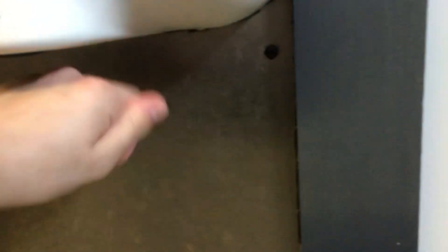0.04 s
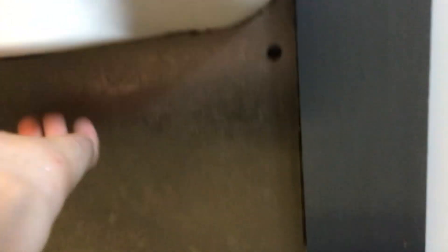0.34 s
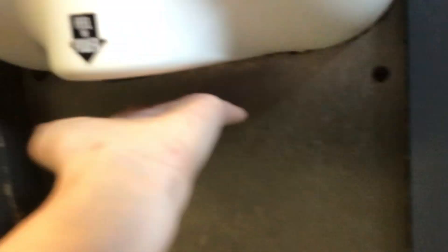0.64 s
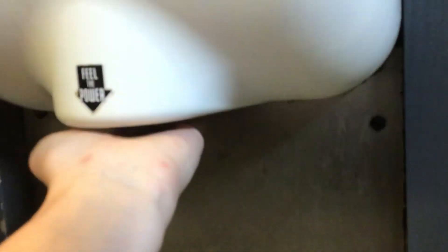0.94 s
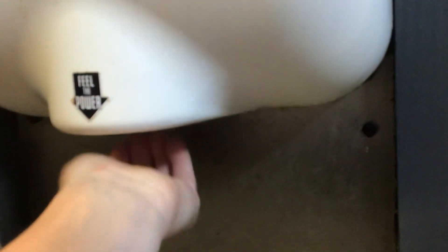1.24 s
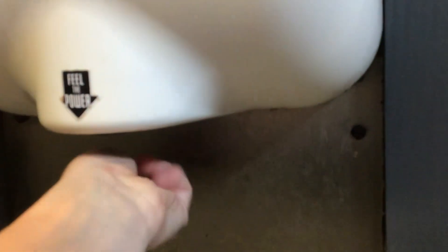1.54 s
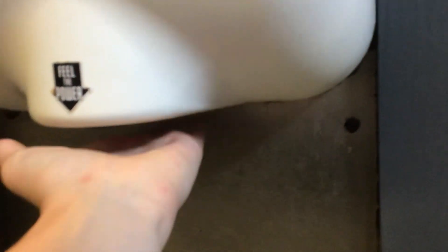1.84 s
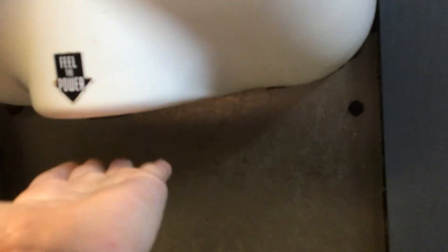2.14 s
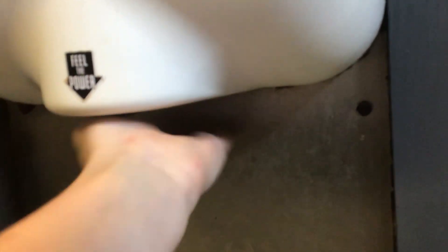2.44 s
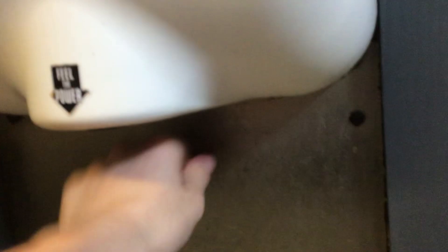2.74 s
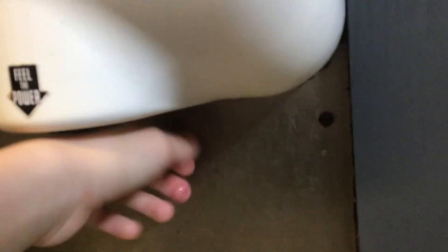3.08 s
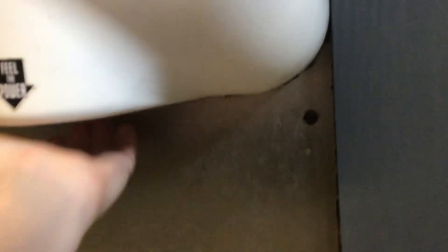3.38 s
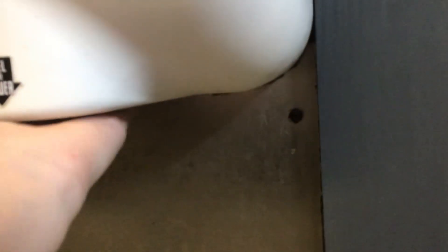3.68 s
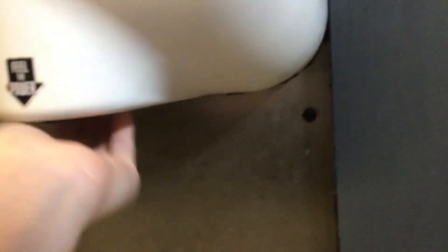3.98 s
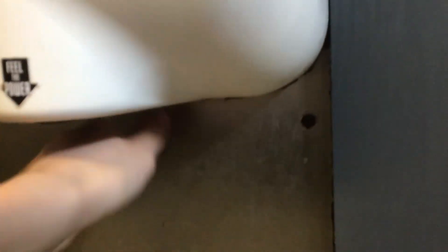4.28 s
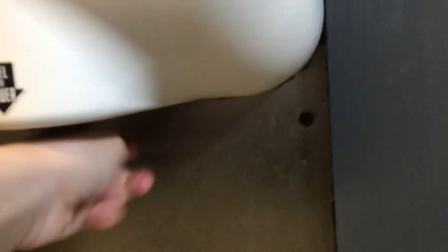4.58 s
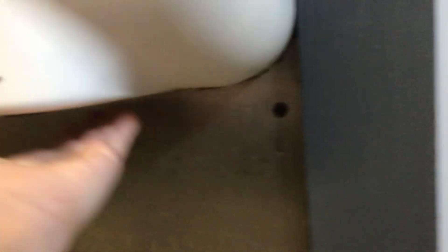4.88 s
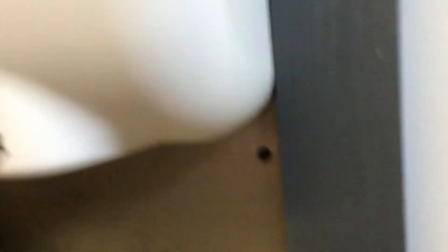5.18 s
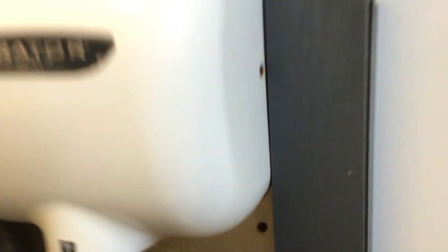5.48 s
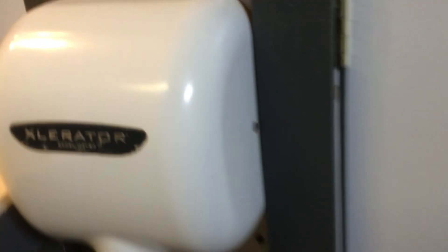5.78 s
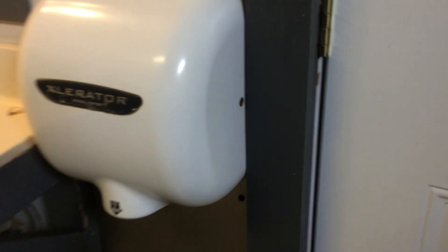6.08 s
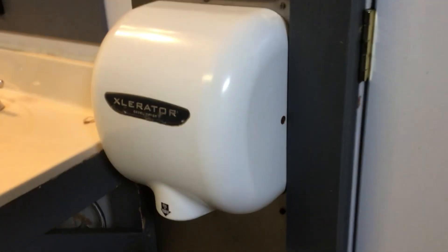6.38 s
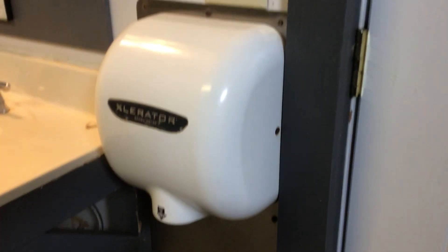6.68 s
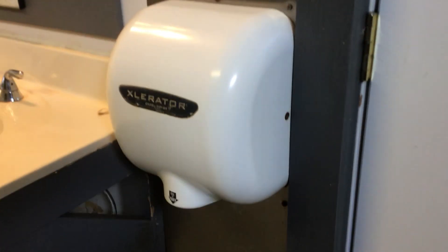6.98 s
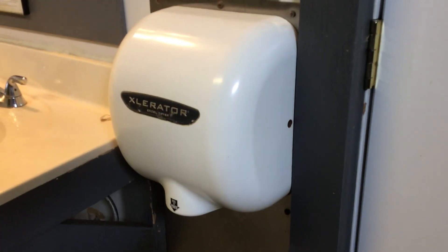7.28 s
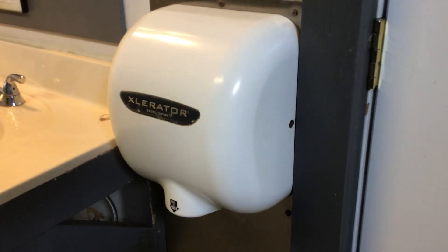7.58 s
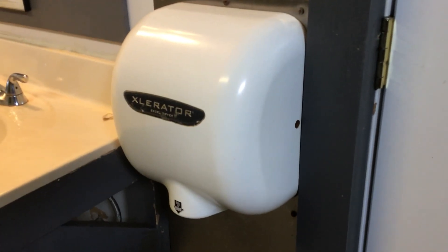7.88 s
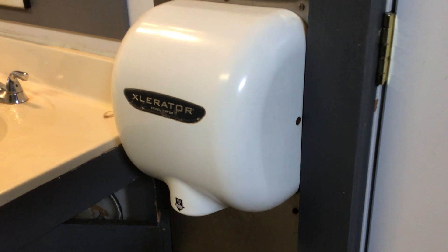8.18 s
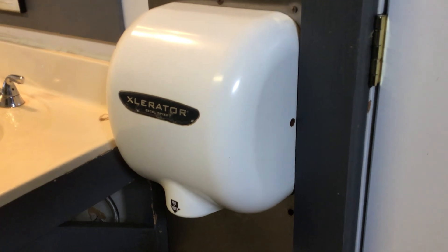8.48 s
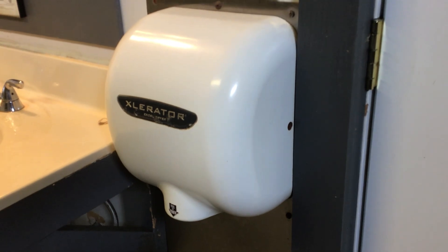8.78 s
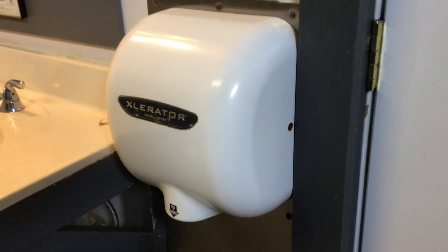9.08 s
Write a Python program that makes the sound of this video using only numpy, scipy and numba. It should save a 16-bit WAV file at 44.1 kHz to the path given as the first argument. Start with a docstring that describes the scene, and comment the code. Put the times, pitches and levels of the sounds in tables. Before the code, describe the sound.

A loud hand dryer roars and hisses over a moving hand, then clicks and winds down with a falling whine.

```python
"""A small tiled washroom, one microphone at arm's length from a high-speed hand dryer.
Air rushes through the housing over the motor's hum and whine. The jet roars on a turning hand, rings in
the cupped palm and hisses when skin comes close to the nozzle; stray gusts thump the microphone.
The hand leaves, the listener steps back, a relay clicks, and the motor coasts down, its tones sliding
through the resonances of the housing."""
import sys
import numpy as np
from scipy import signal
from scipy.fft import rfft, irfft, next_fast_len
from scipy.io import wavfile
from scipy.ndimage import uniform_filter1d
from numba import njit

SR = 44100
rng = np.random.default_rng(int(sys.argv[2]) if len(sys.argv) > 2 else 0)


def output_pcm(signal):
    """Save a mono or channel-first signal as 16-bit PCM at the path in sys.argv[1].

    Samples are clipped to [-1, 1] before scaling.
    """
    pcm = np.clip(np.atleast_2d(signal).T, -1, 1) * 32767
    wavfile.write(sys.argv[1], SR, np.round(pcm).astype(np.int16))


N = 411453
TIME = np.arange(N) / SR
FREQ = np.maximum(np.arange(N // 2 + 1) * SR / N, 1)
FULL_SPEED_HZ, TOP_HZ = 382, 15800  # shaft turns per second; upper limit of the recorder


def undb(db):
    """Decibels to gain."""
    return 10 ** (np.asarray(db) / 20)


def curves(table):
    """The columns of a table, joined by straight lines in time."""
    times, *columns = np.transpose(table)
    return [np.interp(TIME, times, column) for column in columns]


def colour(points, hz=FREQ):
    """Gain of a (frequency [Hz], level [dB]) spectrum at the given frequencies."""
    freqs, db = np.transpose(points)
    return undb(np.interp(np.log(hz), np.log(freqs), db))


def resonance_gain(modes, hz=FREQ):
    """Gain of a resonant body: each mode stands out of a flat base."""
    peaks = sum(undb(db) ** 2 / (1 + (2 * (hz - f) / width) ** 2) ** 2 for f, width, db in modes)
    return np.sqrt(1 + peaks)


def noise(gain):
    """Noise of rms 1, shaped by a gain at each frequency."""
    size = next_fast_len(N, True)
    gain = np.interp(np.arange(size // 2 + 1) * SR / size, FREQ, gain)
    x = irfft(rfft(rng.standard_normal(size)) * gain, size)[:N]
    return x / x.std()


def ringing_air(modes):
    """Resonances stirred by airflow: one band of noise for each."""
    return sum(undb(db) * noise(1 / (1 + (2 * (FREQ - hz) / width) ** 2)) for hz, width, db in modes)


def steady(x, size=SR // 10):
    """Hold the rms at 1 over windows of this many samples."""
    return x / np.sqrt(uniform_filter1d(x ** 2, size) + 1e-12)


def walk(rate_hz):
    """A random wander with a spread near 1."""
    knots = rng.standard_normal(4096)
    return np.sqrt(3 / 2) * np.interp(TIME * rate_hz, np.arange(len(knots)), knots)


@njit
def band(x, hz, width_hz):
    """State-variable band-pass with a moving centre."""
    y, band_state, low_state = np.empty(len(x)), 0., 0.
    for i in range(len(x)):
        g, damping = np.tan(np.pi * hz[i] / SR), width_hz / hz[i]
        v = (band_state + g * (x[i] - low_state)) / (1 + g * (g + damping))
        band_state, low_state = 2 * v - band_state, low_state + 2 * g * v
        y[i] = damping * v
    return y


def below(x, hz):
    """Low-pass without phase shift, so that split bands add up again."""
    return signal.sosfiltfilt(signal.butter(2, hz, fs=SR, output="sos"), x)


def room(x, wet_db, t60):
    """Direct sound and the dense echo of close tiled walls, at unchanged power."""
    t = TIME[:SR // 2]
    tail = rng.standard_normal(len(t)) * undb(-60 * t / t60) * (t > .003)
    response = undb(wet_db) * tail / np.linalg.norm(tail)
    response[0] = 1
    return signal.fftconvolve(x, response / np.linalg.norm(response))[:N]


# Background of the washroom: (frequency [Hz], relative level [dB])
ROOM_TONE = [(25, -32), (60, -7), (115, -4), (200, -4), (420, -16), (600, -21), (1000, -22), (2000, -29),
             (5000, -46.5), (15000, -38)]

def room_tone():
    """A faint, low rumble all around the microphone."""
    return noise(colour(ROOM_TONE)) * undb(-54)


def shaft_speed(coast_at_s=5.8005, drag_per_s=.2993, friction_per_s=.2255):
    """Turns per second: full speed, then a coast against air drag (speed squared) and bearing friction."""
    fade = np.exp(-friction_per_s * np.maximum(TIME - coast_at_s, 0))
    return FULL_SPEED_HZ * fade / (1 + drag_per_s / friction_per_s * (1 - fade))


# Turbulence in the blower: (frequency [Hz], relative level [dB])
RUSH_SPECTRUM = [(30, -30), (70, -6), (160, 0), (450, -2.5), (700, 2.5), (1050, -8.5), (2000, 5.5),
                 (2900, 1), (3600, -8.5), (5300, -21), (8500, -21), (10500, -28), (12500, -19),
                 (15500, -21)]
# Resonances of the housing: (frequency [Hz], width [Hz], gain [dB])
HOUSING_MODES = [(115.4, 15.6, 12.5), (598, 110, 8), (812, 22, 3.5), (1344, 160, 5), (1750, 88, 11),
                 (1957, 155, 13), (2340, 210, 4), (2667, 62, 11), (4126, 490, 11), (4560, 130, 12),
                 (6470, 1000, 10.5)]
# Air cavity behind the shell: (frequency [Hz], width [Hz], level at full speed [dB])
CAVITY_MODES = [(565, 80, -45), (818, 43, -57), (1930, 180, -57.5), (2644, 29, -54.5), (4360, 960, -55.5)]

def blower(speed, rush_db=-27, speed_power=2.29):
    """Turbulence rings the housing; as the fan slows the treble dies first and the hollow ring last."""
    slowing_db = 20 * np.log10(speed / FULL_SPEED_HZ)
    air = noise(colour(RUSH_SPECTRUM) * resonance_gain(HOUSING_MODES))
    low, high = below(air, 900), air - below(air, 4900)
    middle = air - low - high
    dulled = low * undb(-.05 * slowing_db) + middle + high * undb(.36 * slowing_db)
    rush = dulled * undb(rush_db + speed_power * slowing_db)
    ring = ringing_air(CAVITY_MODES) * undb(1.1 * slowing_db)
    return room(rush + ring, wet_db=-7.5, t60=.35)


# Resonances of the wall mount: (frequency [Hz], width [Hz], gain [dB])
MOUNT_MODES = [(355, 36, 18.5), (273, 52, 19.5), (234, 27, 16), (209, 27, 22.5), (156, 34, 17)]

def shaft_hum(speed, angle):
    """Shaft unbalance hums through the mount, louder under the nozzle than after the step back."""
    near_db = np.interp(TIME, [4.9, 5.2], [8, 0])
    gain = undb(-57.5 + near_db) * resonance_gain(MOUNT_MODES, speed) * (speed / FULL_SPEED_HZ) ** .99
    return room(gain * np.sin(angle), wet_db=-1, t60=.65)


# How well the outlet passes the blade tone: (frequency [Hz], gain [dB])
OUTLET_RESPONSE = [(1100, -37), (1230, -29), (1380, -7.5), (1590, -12.5), (1830, -6), (1970, 2),
                   (2130, -3.5), (2300, 0.5), (2460, -5), (2660, 2), (3450, -3.5)]

def blade_tone(speed, angle, blades=9, waver_db=2.9):
    """The fan blades sing through the housing, shaken by uneven inflow."""
    hz = blades * speed
    tone = undb(1.8 * walk(60)) * np.sin(blades * angle + .45 * walk(90))
    # the shell shields the tone until the listener steps out from under it
    shade_db = np.interp(TIME, [5.33, 5.42], [-6.5, 0])
    tone *= undb(-41 + shade_db + waver_db * walk(8))
    tone *= resonance_gain(HOUSING_MODES, hz) * colour(OUTLET_RESPONSE, hz)
    return room(tone, wet_db=-2.5, t60=.64)  # as it falls, it beats against its own echo


# Commutator whine ahead of the vents, by multiple of the bar rate: (relative level [dB])
WHINE_HARMONICS = [-73, -71, -73, -79, -83]
# How the whine leaks through the vents: (frequency [Hz], gain [dB])
VENT_RESPONSE = [(2400, 17), (2700, 16.5), (3100, 6), (3800, 12), (5000, -5), (5500, -6), (5950, -13),
                 (6500, -3), (7300, -9), (8300, -6), (9000, -1), (10000, -11), (10500, -25), (11500, -7),
                 (13300, -6), (15300, -2)]

def brush_whine(speed, angle, bars=24, chatter_rad=1.05):
    """The brushes whine on the commutator bars; chatter and the room fray each line."""
    whine = 0
    for k, db in enumerate(WHINE_HARMONICS, 1):
        hz = k * bars * speed
        line = undb(2.5 * walk(24)) * np.sin(k * bars * angle + chatter_rad * walk(140))
        whine += undb(db) * line * (hz < TOP_HZ) * colour(VENT_RESPONSE, hz)
    strike = 2.1 * (speed / FULL_SPEED_HZ) ** .53  # they hit the bars harder at speed
    return room(whine * strike, wet_db=5, t60=.34)


def motor(speed):
    """One slightly unsteady shaft drives the hum, the blade tone and the whine."""
    angle = 2 * np.pi * np.cumsum(speed * (1 + .001 * walk(25))) / SR
    return np.sqrt(2) * (shaft_hum(speed, angle) + blade_tone(speed, angle) + brush_whine(speed, angle))


def swell(at, half_s, flatness=2):
    """A movement of the hand: a smooth approach and retreat, peak 1; flatness above 2 makes it linger."""
    return np.exp(-.5 * np.abs((TIME - at) / half_s) ** flatness)


# The palm cups the jet: (time [s], half length [s], resonance [Hz], level [dB])
CUPPINGS = [(0.012, 0.029, 1300, -27), (0.416, 0.079, 880, -26.5), (0.565, 0.044, 1220, -23.5),
            (0.775, 0.065, 1480, -23), (1.73, 0.097, 910, -28), (1.865, 0.036, 1330, -27),
            (2.38, 0.053, 1160, -27), (2.83, 0.076, 1230, -29), (3.378, 0.07, 1480, -26),
            (4.775, 0.042, 1410, -20)]

def cupped_palm(flat_palm_db=-40, width_hz=920.):
    """The palm rings hollow at each cupping and glides quietly from one pitch to the next."""
    _, hz, _ = curves(CUPPINGS)
    gain = undb(flat_palm_db) + sum(undb(db) * swell(at, half_s) for at, half_s, _, db in CUPPINGS)
    ring = band(rng.standard_normal(N), hz, width_hz)
    return steady(band(ring, hz, width_hz)) * gain


# Air hissing over skin: (frequency [Hz], relative level [dB])
HISS_SPECTRUM = [(1500, -28), (3000, 17), (3800, 6.5), (4300, 13.5), (5300, -1), (6100, 4.5), (6800, 10),
                 (7400, 3.5), (8400, 5), (10000, -1), (11400, -5), (12800, 3.5), (15500, 3.5)]
# Thin whistles of air on edges: (frequency [Hz], width [Hz], relative level [dB])
EDGE_WHISTLES = [(4280, 44, -5), (6720, 70, -21), (6670, 60, -13)]

def skin_hiss(rise_db):
    """Skin near the nozzle hisses, with a harsher bite when closest; the edge whistles swell less."""
    hiss_db = -43.5 + rise_db
    whistles = ringing_air(EDGE_WHISTLES) * undb(.67 * hiss_db - 11)
    bite = band(rng.standard_normal(N), np.full(N, 5500.), width_hz=2500.)
    bite *= undb(-4 + .26 * (hiss_db - hiss_db.max()))
    hiss = noise(colour(HISS_SPECTRUM)) * undb(6) + bite
    return hiss * undb(hiss_db + .6 * walk(45)) + whistles


# The hand turning in the jet: (time [s], roar level [dB], flutter level [dB])
HAND_TURNS = [(0.0, -21.5, -26.5), (0.4, -20.5, -28.5), (0.86, -17, -26.9), (1.16, -19.5, -26.8),
              (1.21, -17.4, -28.5), (1.37, -20.5, -28.5), (1.56, -17, -28.5), (1.77, -21, -28),
              (1.86, -12.1, -22.9), (2.15, -19.5, -35.5), (2.31, -15.5, -26.5), (2.64, -25, -28.5),
              (2.88, -15, -23), (3.08, -20.5, -27), (3.29, -18.0, -28.5), (3.74, -17, -22.5),
              (4.14, -21.5, -31.5), (4.41, -21.5, -25), (4.98, -16, -29.5), (5.1, -24, -40)]
# Skin passing close to the nozzle: (time [s], half length [s], hiss rise [dB], roar rise [dB])
CLOSE_PASSES = [(0.161, 0.035, 10, 7), (0.3, 0.035, 5, 2.5), (1.028, 0.074, 16, 5), (1.939, 0.044, 8, 1.5),
                (2.477, 0.044, 17.5, 5.8), (3.102, 0.06, 20.5, 8.5), (3.486, 0.028, 6.5, 3.8),
                (3.65, 0.063, 16.5, 6), (3.866, 0.071, 8.5, 2), (4.62, 0.046, 19, 6.5)]
# The roar before the gap tunes it: (frequency [Hz], relative level [dB])
ROAR_SPECTRUM = [(300, -15), (900, -3.5), (1400, -1.5), (2000, -0.5), (2750, 2), (3200, -8), (3800, -12.5),
                 (4300, -11.5), (5200, -20.5), (8000, -54)]
# Low flutter of air on the hand: (frequency [Hz], relative level [dB])
FLUTTER_SPECTRUM = [(30, -42), (70, -4), (130, 0), (220, 4), (450, 1), (570, 5.5), (700, 3.5), (950, -4.5),
                    (1500, -6.5), (3000, -41)]

def jet(open_roar_db=-18, open_gap_hz=2060, gap_hz_per_db=24.5, cup_pull_hz=169, lead_s=.011):
    """Air breaks on the hand: skin nearing the nozzle lifts the roar, then the hiss, and tunes the gap."""
    roar_db, flutter_db = curves(HAND_TURNS)
    close_db = sum(db * swell(at, half_s, flatness=2.05) for at, half_s, db, _ in CLOSE_PASSES)
    rise_db = close_db + roar_db - open_roar_db
    surge_db = sum(db * swell(at - lead_s, half_s) for at, half_s, _, db in CLOSE_PASSES)
    choke_db = -5.5 / (1 + np.exp(16.5 - close_db))  # only the closest passes choke the roar
    roar_gain = undb(roar_db + surge_db + choke_db + .5 * walk(16))
    # the gap rings higher as the hiss rises; a cupped palm enlarges it and lowers the ring
    cupping = sum(swell(at, half_s) for at, half_s, _, _ in CUPPINGS)
    gap_hz = open_gap_hz + gap_hz_per_db * rise_db - cup_pull_hz * cupping
    eddies = undb(.96 * walk(70))
    roar = steady(band(noise(colour(ROAR_SPECTRUM)), gap_hz, width_hz=1000.)) * roar_gain
    palm = cupped_palm()
    flutter = noise(colour(FLUTTER_SPECTRUM)) * undb(flutter_db)
    air = roar + palm + flutter + skin_hiss(rise_db) + gap_hoots()
    hand_in_stream = np.interp(TIME, [5.05, 5.15], [1, 0])
    return room(hand_in_stream * eddies * air, wet_db=-13.5, t60=.35)


# Hoots between hand and nozzle: (time [s], half length [s], pitch [Hz], level [dB])
GAP_HOOTS = [(0.85, .02, 2300, -17), (1.905, .025, 2280, -11.5), (3.0, .02, 2450, -18),
             (3.163, 0.014, 2690, -14.5), (3.464, 0.011, 2430, -13), (4.574, .016, 2530, -18),
             (4.973, 0.033, 2390, -18.5)]

def gap_hoots(width_hz=150.):
    """The gap locks briefly into a hoarse near-whistle as it passes through its best size."""
    air = rng.standard_normal(N)
    out = np.zeros(N)
    for at, half_s, hz, db in GAP_HOOTS:
        centre = np.full(N, float(hz))
        hoot = band(band(air, centre, width_hz), centre, 6.6 * width_hz)
        out += steady(hoot, size=SR // 30) * undb(db) * swell(at, half_s)
    return out


# Gusts right on the microphone: (time [s], level [dB], half length [s], centre [Hz])
MIC_GUSTS = [(0.954, -25, 0.035, 220), (1.07, -30, .015, 180), (1.156, -28, 0.023, 150),
             (1.92, -28, 0.045, 170), (2.464, -26, .022, 160), (3.083, -20, 0.014, 200),
             (3.103, -30, 0.014, 75), (3.189, -27, 0.019, 170), (3.668, -24, 0.02, 110),
             (3.98, -10, 0.013, 108), (4.001, -9.5, .016, 66), (4.646, -26, 0.014, 150)]

def gusts():
    """Air thrown off the hand buffets the microphone: a few uneven pressure swings over a rumble."""
    out = np.zeros(N)
    uneven_time = np.cumsum(np.exp(.22 * walk(170))) / SR
    air = rng.standard_normal(N)
    rumble = steady(below(air, 250) - below(air, 40), size=SR // 40)
    for at, db, half_s, hz in MIC_GUSTS:
        swings = np.sqrt(2) * np.sin(2 * np.pi * hz * uneven_time)
        out += undb(db) * swell(at, half_s) * (swings + .29 * rumble)
    return out


def relay(at=5.4155, attack_s=.00022, decay_s=.00077):
    """The contact snaps open: one dry tick with a few short, bright resonances."""
    t = np.maximum(TIME - at, 0)
    # (frequency [Hz], relative level [dB])
    modes = [(1000, -4), (3300, -1), (4400, -2), (5900, -6), (12500, -14), (15000, -10.5)]
    ring = sum(undb(db) * np.sin(2 * np.pi * hz * t) for hz, db in modes)
    envelope = np.exp(-t / decay_s) * (1 - np.exp(-t / attack_s)) ** 2
    return room(ring * envelope * undb(-6), wet_db=-14, t60=.19)


def scene():
    """Hand, dryer and washroom as they reach the one microphone."""
    speed = shaft_speed()
    return (jet() + blower(speed) + motor(speed) + relay() + gusts() + room_tone())[None]


def record(dry):
    """The microphone drops the deepest bass; the recorder stops at full scale and cuts the top."""
    low_cut = signal.butter(4, 45, "high", fs=SR, output="sos")
    high_cut = signal.ellip(10, .1, 80, TOP_HZ, fs=SR, output="sos")
    return signal.sosfilt(high_cut, np.clip(signal.sosfilt(low_cut, dry), -1, 1))


dry = scene()
out = record(dry)
output_pcm(out)
```